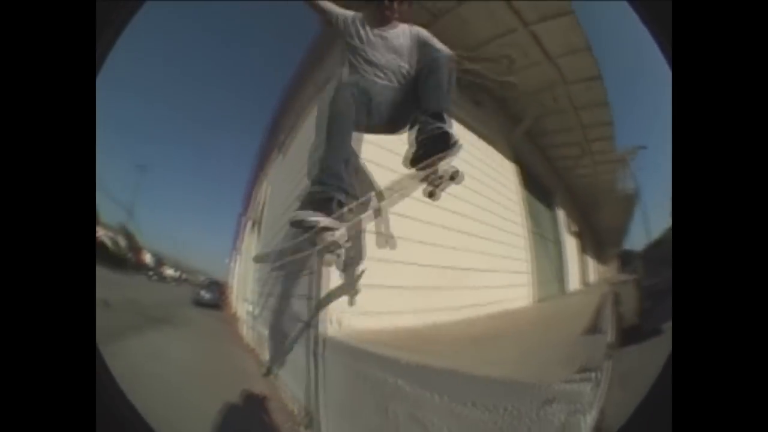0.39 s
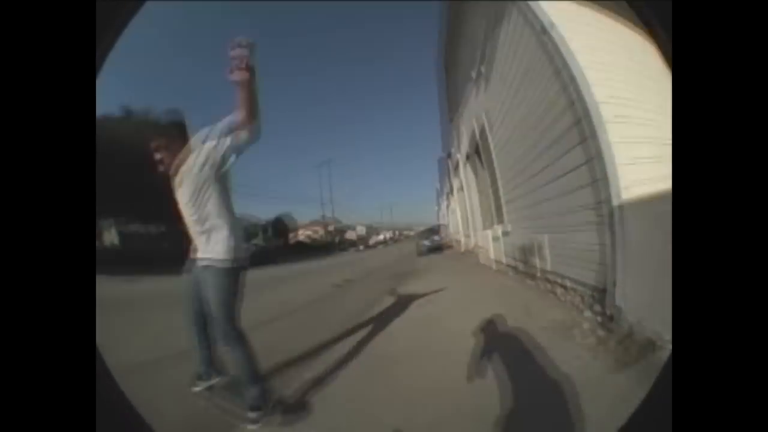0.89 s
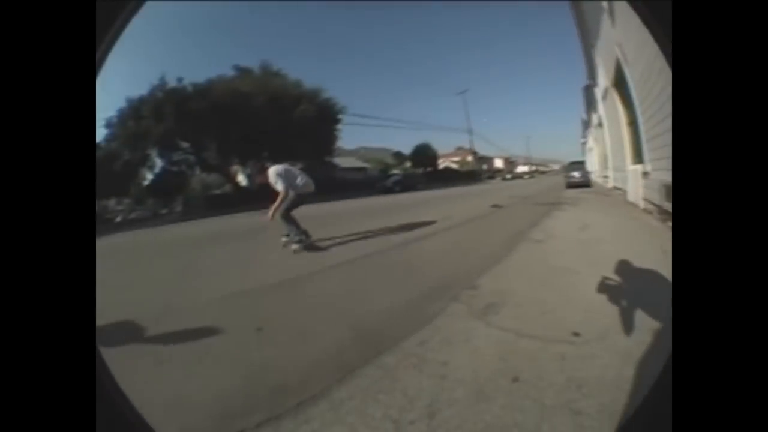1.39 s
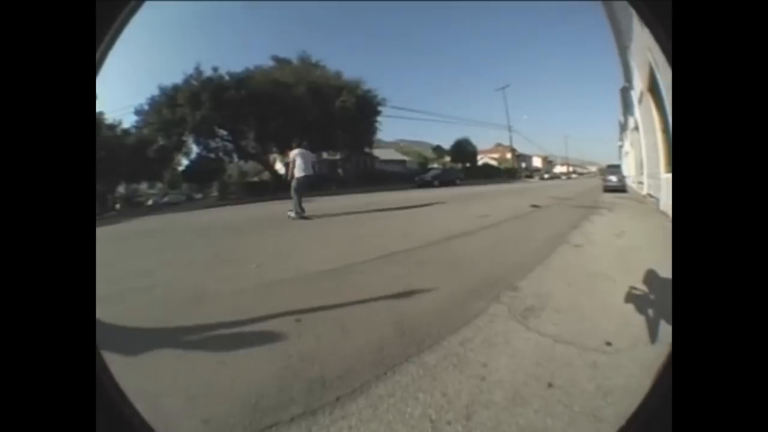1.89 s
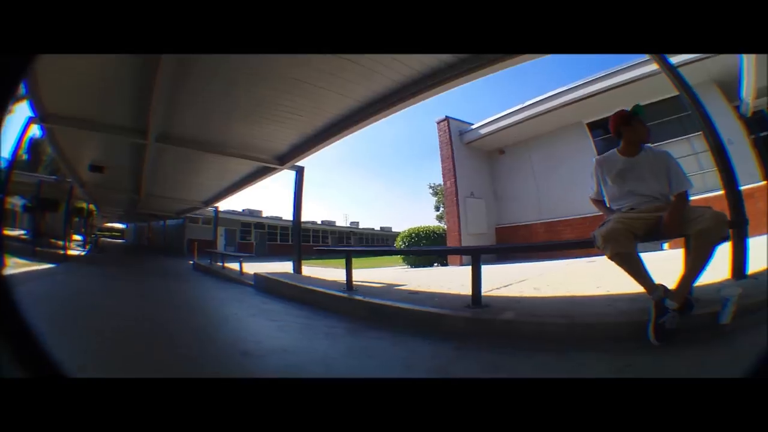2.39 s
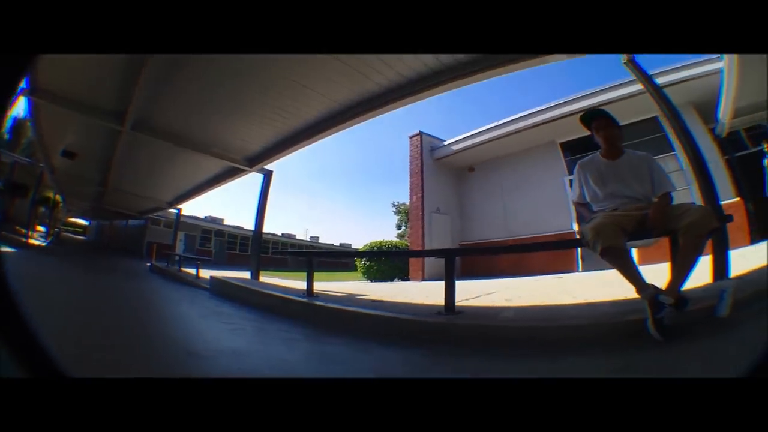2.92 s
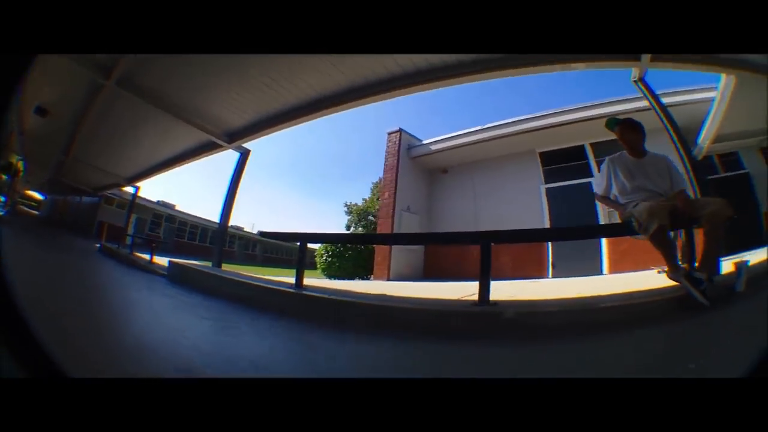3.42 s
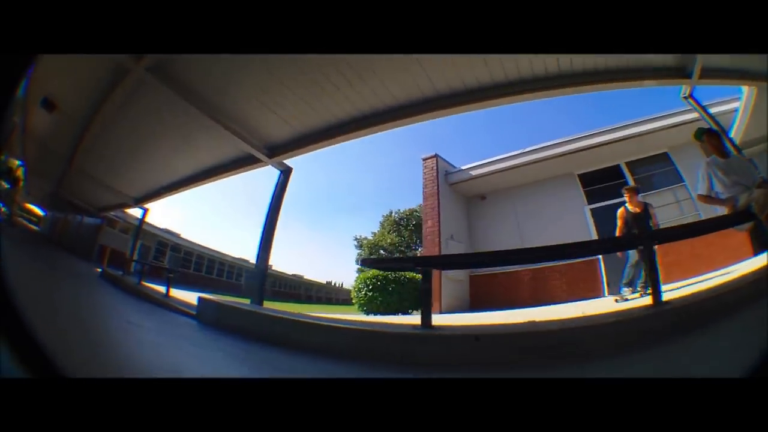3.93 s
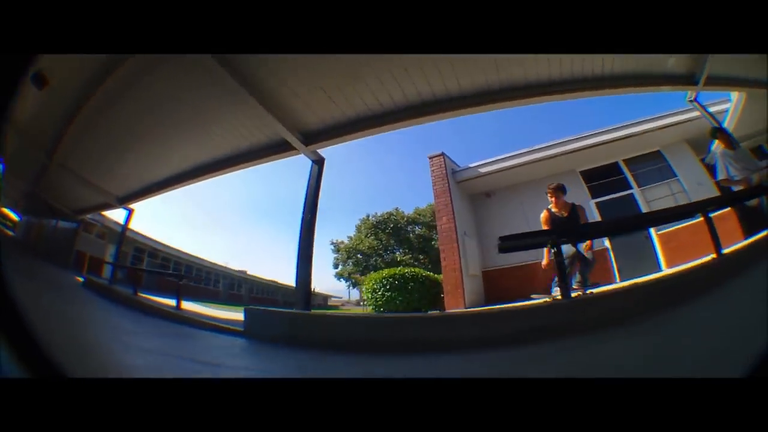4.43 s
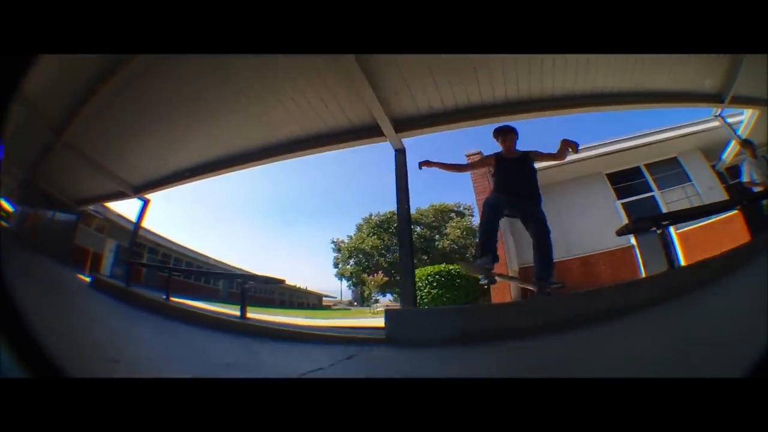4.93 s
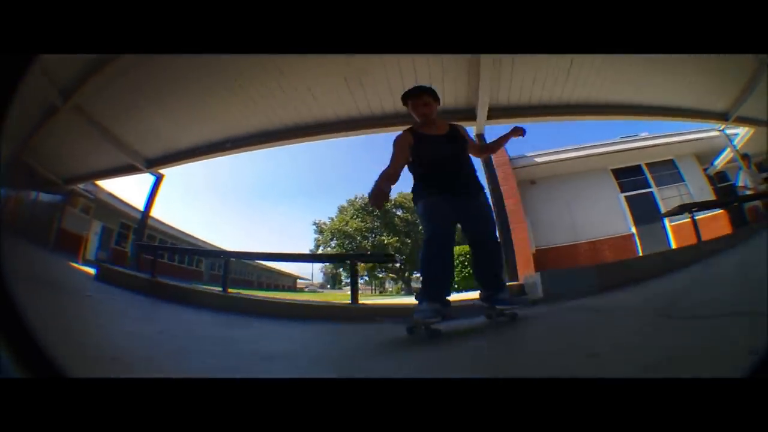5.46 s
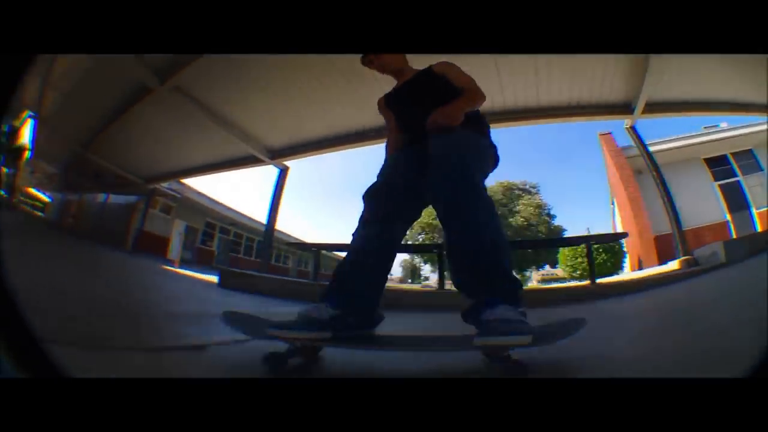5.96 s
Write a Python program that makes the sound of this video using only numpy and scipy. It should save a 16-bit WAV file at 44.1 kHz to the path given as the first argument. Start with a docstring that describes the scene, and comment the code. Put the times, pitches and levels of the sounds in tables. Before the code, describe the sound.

Skateboard pops off a ledge, slams down left and rolls away on asphalt; brief silence; then roofed walkway rolling with clacks and a landing.

```python
"""A street, then a covered walkway, two skateboarding scenes with a short silence between them. In the street a
board pops off a ledge, flips, lands hard on the listener's left and rolls away over asphalt. Under the roof, in mono,
boards roll over slabs: wheels knock on joints, a board pops, clacks on a ledge and lands. Rolling is noise shaped into
five parts of board and ground; blows are noisy contacts through a ringing board; small parts, deck and ledge ring as
decaying sines. Sparse echoes and steady air place it all, and the loudest peaks overload."""
import sys
import numpy as np
from scipy import signal
from scipy.fft import rfft, irfft
from scipy.io import wavfile
from scipy.ndimage import uniform_filter1d

SR = 44100
rng = np.random.default_rng(int(sys.argv[2]) if len(sys.argv) > 2 else 0)


def wav_out(sig):
    """Save sig, one row per channel (or a flat mono array), as 16-bit PCM at SR to the path in sys.argv[1]."""
    wavfile.write(sys.argv[1], SR, np.round(np.clip(np.atleast_2d(sig).T, -1, 1) * 32767).astype(np.int16))


def natural_amplitude(level_db):
    """Convert a level in decibels to a linear amplitude factor, elementwise."""
    exponent = np.asarray(level_db, float) / 20
    return 10 ** exponent


N = 268128
STREET_END_S, WALK_START_S, LANDING_S = 2.283, 2.412, .92

# far traffic and air in the street: (frequency [Hz], level [dB])
STREET_AIR = [(25, -45), (120, -35.5), (300, -55.5), (1500, -52.5), (15000, -50.5)]
# air under the roof: (frequency [Hz], level [dB])
WALK_AIR = [(25, -63), (70, -41.5), (200, -49), (1500, -45.5), (15000, -59)]
# echo decay in the street: (frequency [Hz], time to fall 60 dB [s])
STREET_ECHO = [(200, 0.3), (1350, 0.42), (4000, 0.23), (12000, 0.44)]
# echo decay in the walkway: (frequency [Hz], time to fall 60 dB [s])
WALK_ECHO = [(200, 0.2), (700, 0.15), (2500, 0.069), (12000, 0.045)]

# street rolling: (time [s], how hard and near the wheels roll [dB], share of free wheel spin and rasp [dB])
STREET_ROLL = [(0, -1.5, 1.5), (.15, -4.5, 4), (.23, -4, 5.5), (.3, -8.5, 0), (.43, -19, 11),
               (.54, -18, 11.5), (.67, -23, 10), (.84, -23, 7.5), (.91, -17, 4.5), (1.03, 2, -2),
               (1.12, 3.5, -2.5), (1.4, 1.5, 0.2), (1.67, -1.5, -1), (1.95, -1.5, -1.5), (2.1, 0.5, -0.7),
               (2.28, -1.5, 0.2)]
# walkway rolling: (time [s], how hard and near the wheels roll [dB], share of free wheel spin and rasp [dB])
WALK_ROLL = [(2.42, -5, -1.5), (2.75, -5, -2), (3.04, -5, -2.1), (3.22, -7, 0), (3.35, -3.5, 1.5),
             (3.46, 0.3, -1.5), (3.59, -0.8, -0.6), (3.89, 2, -0.2), (4.09, 5, 0.1), (4.28, 6.5, -1.8),
             (4.55, 3.5, -0.5), (4.8, 7, -1.7), (5.02, 1, 2), (5.22, -1.3, 4), (5.4, -4.5, 1.7),
             (5.62, 0, 0.5), (5.76, -10, 2), (5.92, -7, 3), (6.08, 3.5, 1)]
# colour of street rolling, levelled later in each part: (frequency [Hz], relative density [dB])
STREET_TONE = [(20, -45.5), (60, -27), (130, -7), (210, -1.5), (560, 7), (700, -3.5), (1300, -9.5),
               (1600, -15), (2300, -11.5), (3100, -10.5), (5000, -14), (8500, -21.5), (12600, -25.5),
               (16000, -33)]
# colour of walkway rolling, levelled later in each part: (frequency [Hz], relative density [dB])
WALK_TONE = [(20, -77), (60, -68), (120, -22.5), (300, -13.5), (500, -6.5), (850, -4.5), (1400, -12),
             (2300, -26), (2700, -29.5), (4300, -30.5), (9700, -43), (14800, -54), (16000, -40)]
# resonances in street rolling: (centre [Hz], width [Hz], lift [dB])
STREET_RINGS = [(1880, 200, 5), (4080, 520, 9.5), (6360, 250, 3), (7900, 600, 4)]
# resonances in walkway rolling: (centre [Hz], width [Hz], lift [dB])
WALK_RINGS = [(600, 90, 6.5), (700, 90, 6.5), (1250, 250, 2), (2150, 400, 2)]
# where one rolling part takes over from the next in the street: (edges [Hz])
STREET_EDGES_HZ = (250, 650, 1500, 5500)
# where one rolling part takes over from the next in the walkway: (edges [Hz])
WALK_EDGES_HZ = (300, 900, 1700, 5500)
# street rows are ground rumble, deck roar, truck buzz, wheel rasp, bearing hiss:
# (base level [dB], follows rolling [dB/dB], follows spin [dB/dB], fine-grain power share [0-1])
STREET_PARTS = [(-44.5, 0.82, -0.2, .75), (-35, 0.69, -0.83, 0.6), (-33.5, 1.46, 0.63, 0.6),
                (-40.5, 0.99, 1.1, 0.94), (-38, 1.32, 1.68, 0.56)]
# walkway rows, the same five parts:
# (base level [dB], follows rolling [dB/dB], follows spin [dB/dB], fine-grain power share [0-1])
WALK_PARTS = [(-43, 1.46, 1.4, 1), (-25.5, 1.1, 0.19, 0.81), (-27, 0.85, 0.072, 1), (-34, 0.98, 1.34, 0.89),
              (-42.5, 1.21, 1.72, 0.62)]
# after the landing the five parts drift apart as the board slows and leaves: (drift [dB/s])
LEAVING_DB_PER_S = (-3, 0.2, -3, -0.6, -0.8)
JUDDER_S, JUDDER_DB = 0.011, 0.85  # the whole board judders over coarse patches

# free wheel spinning in the air: (time [s], level [dB])
WHEEL_WHINE = [(.67, -80), (.705, -57), (.83, -61), (.89, -72)]
# loose hardware rattling on close notes: (time [s], level [dB], lowest note [Hz], contact [s])
RATTLES = [(1.557, -29, 1870, .007), (1.568, -24.5, 1870, .007), (1.65, -25.5, 1900, .009),
           (1.667, -27.5, 1870, .008), (2.594, -28, 2280, .02), (2.622, -24, 2280, .05),
           (2.675, -26, 2280, .015), (2.702, -25, 2280, .018), (2.73, -28, 2280, .03),
           (2.778, -31, 2280, .03), (2.873, -26, 2280, .03), (2.905, -21.5, 2280, .055)]
# notes that rattle together: (ratio to the lowest note)
RATTLE_NOTES = (1, 1.11, 1.23)
# board parts that clink or knock on one note: (time [s], level [dB], note [Hz], contact [s])
CLINKS = [(1.375, -27, 4200, .008), (2.038, -25.5, 4067, 0.17), (2.631, -8.5, 710, 0.0046),
          (2.631, -11, 1250, 0.0065), (2.676, -14, 734, 0.0039), (2.779, -21, 720, .012),
          (2.956, -35, 2950, .007), (2.969, -24, 3000, 0.01), (3.387, -26, 3180, .006),
          (4.231, -23, 4100, 0.0068), (4.367, -15.5, 4240, 0.0037), (4.459, -6, 805, 0.0045),
          (4.986, -18, 1570, 0.055), (5.176, -11.5, 1530, 0.0083), (5.2, -26, 1160, 0.026),
          (5.385, -12, 655, 0.013), (5.626, -7, 610, 0.01)]
RATTLE_CYCLES, CLINK_CYCLES = 36, 25  # cycles until a note has lost 60 dB
CHATTER_DB = 4.0  # rms unevenness of a ringing contact
# hum of the knocked ledge: (mode [Hz], level [dB], time to fall 60 dB [s])
LEDGE = [(142, 3, .45), (210, 0, .7), (282, -3, .35), (408, -4, .45)]
# knocks on the ledge: (time [s], level [dB], contact [s])
LEDGE_KNOCKS = [(5.163, -21, .002), (5.364, -19, .003), (5.558, -23, .002), (5.618, -23, .002)]
# deck singing free in the air: (mode [Hz], level [dB], time to fall 60 dB [s])
FREE_DECK = [(720, -9, .18), (1303, -1, .32), (1345, 0, .27), (1645, -5, .24), (2056, -11, .25),
             (2315, -8, .2), (2800, -8, .15)]
# pop and foot flick that set the deck singing: (time [s], level [dB], contact [s], share of ring time left [0-1])
FREE_STRIKES = [(.253, -10.5, .0003, 1), (.5105, -25, .0003, .2)]

# the landing shakes ground and microphone: (swing [Hz], left level [dB], right level [dB], time to fall 60 dB [s])
THUMP = [(30, -12, -33.5, 0.15), (151, -11, -25, 0.091), (212.5, -10.5, -14.5, 0.14)]
# blows and knocks: (time [s], drive [dB], thud tilt [dB], crack tilt [dB], contact [s])
BLOWS = [(0.2508, 2.4, -13, 1, 0.0082), (0.5088, -24.5, -31, -6, 0.0046), (.836, -44, 9.5, -12, 0.026),
         (0.9168, 6.5, -3, -6, 0.0098), (.955, -15, 4, -42, 0.0057), (1.332, -29, 8, 7.5, 0.0066),
         (1.4168, -35, 14, 5, 0.0028), (2.4216, -23, 7, -18.5, 0.0073), (2.4937, -26.5, -8, -0.5, 0.0017),
         (2.5524, -16.5, 4, 0.3, .005), (2.564, -19, 2.5, -9, 0.0048), (2.6312, -10.5, -4, -0.5, 0.00086),
         (2.6758, -16, -2, -7.5, 0.0027), (2.893, -20, -1, -11, 0.026), (2.9248, -18, 2.5, -8.5, 0.031),
         (2.935, -20.5, -16, 8, 0.0015), (3.276, -14.5, 5.5, -3, .007), (3.385, -20, -3, -3, 0.0034),
         (3.5136, -18.5, 9, -8, 0.0063), (3.558, -21, -6.5, -7.5, 0.017), (3.6247, -17, -24, -10, 0.0017),
         (3.939, -24, 11.5, 4, 0.011), (4.3297, -26, -1, 6.5, 0.017), (4.454, -18, 4, 1, 0.002),
         (4.963, -5.5, 0, -2, 0.0077), (4.9753, -12, -2, -11, 0.017), (5.1625, -4.5, 3.5, 0.5, 0.0055),
         (5.1772, -11.5, 1, -34, 0.0037), (5.364, -9, 5, -8, 0.004), (5.3816, -9.5, 5, 1.5, 0.0023),
         (5.556, -16.5, 6.5, -14, 0.016), (5.6179, -1.5, -3, 4.5, 0.0044), (5.629, -3.5, 0, -18, 0.0038)]
# what a struck board rings with: (centre [Hz], width [Hz], lift [dB])
BOARD = [(280, 100, -3.5), (425, 160, -3), (796, 61, 1.5), (1407, 300, 5), (1627, 160, 0.5), (2000, 330, 0),
         (2480, 81, 5.5), (2750, 170, -3), (4170, 270, -2), (4030, 620, 5), (5030, 63, 1.5)]
# basic colour of a blow: (frequency [Hz], gain [dB])
BLOW_TONE = [(40, -30), (150, 1.5), (500, 8), (1500, -5.5), (4000, -3.5), (8000, -11.5), (15000, -21)]
# further colour of all hits under the roof: (frequency [Hz], gain [dB])
WALK_BLOW_TONE = [(60, -39), (250, -6.5), (450, -5.5), (680, 0.5), (1000, 2), (6000, -3.5), (15000, -6.5)]
SETTLE_S, SETTLE_PER_CONTACT = 0.012, 4.5  # time to fall 60 dB after the contact, longer after a long one

# how alike the street's two sides are: (frequency [Hz], likeness [0-1])
STREET_SAME = [(60, 0.45), (240, 0.88), (950, 0.83), (3770, 0.79), (15000, 0.58)]
# lean of the microphone pair, before the skater's own shift: (frequency [Hz], left minus right [dB])
STREET_LEFT = [(60, 9), (240, 10.5), (950, 11), (3770, 10.5), (15000, 8)]
# the skater comes from the right: (time [s], lift on the right, with half as much taken off the left [dB])
SKATER_RIGHT = [(0, 1.6), (.25, 3.4), (.45, 2.8), (.6, .1)]


def evened(x):
    """Scales to rms 1."""
    return x / np.sqrt(np.mean(x ** 2) + 1e-20)


def read(points, hz):
    """Reads a table on a log-frequency axis."""
    f, value = np.transpose(points)
    return np.interp(np.log(hz + 1), np.log(f + 1), value)


def rings_db(rings, hz):
    """Adds up resonant humps, each falling away on both sides of its centre."""
    return sum(db / (1 + ((hz - f) / (width / 2)) ** 2) for f, width, db in rings)


def causal(colour_db):
    """Minimum-phase impulse response of a colour given on an rfft grid."""
    log_gain = np.log(natural_amplitude(np.r_[colour_db, colour_db[-2:0:-1]]))
    spectrum = np.exp(np.conj(signal.hilbert(log_gain)))
    return np.fft.ifft(spectrum).real[:len(colour_db) - 1]


def air(tone):
    """Steady background of the place: coloured noise, two unrelated draws."""
    colour = natural_amplitude(read(tone, np.fft.rfftfreq(N, 1 / SR)))
    return irfft(rfft(rng.standard_normal((2, N))) * colour, N)


def echo(x, t60s, delay_s):
    """Sparse reflections of random sign, each band dying at its own speed."""
    taps = np.zeros((2, SR // 2))
    # one tap in every 20 samples, at a random spot
    at = np.arange(0, SR // 2 - 20, 20) + rng.integers(0, 20, (2, (SR // 2 - 1) // 20))
    np.put_along_axis(taps, at, rng.choice([-1., 1.], at.shape), 1)
    hz, t, z = signal.stft(taps, SR, nperseg=256)
    decay = natural_amplitude(-60 * t / read(t60s, hz)[:, None])
    tail = signal.istft(z * decay, SR, nperseg=256)[1]
    late = np.pad(x, ((0, 0), (round(delay_s * SR), 0)))
    return signal.oaconvolve(late, tail / np.linalg.norm(tail[0]), axes=1)[:, :N]


def whine():
    """A spinning bearing whistles on one narrow, fuzzy note."""
    s, db = np.transpose(WHEEL_WHINE)
    t = np.arange(N) / SR
    level = natural_amplitude(np.interp(t, s, db, -120, -120))
    fuzz = .8 + .8 * evened(uniform_filter1d(rng.standard_normal((2, N)), 250))
    return level * fuzz * np.sqrt(2) * np.sin(2 * np.pi * 2370 * t)


def rung(strikes):
    """Each strike (s, dB, contact s, modes) is a short uneven rattle that rings its modes; two unrelated draws."""
    out, t = np.zeros((2, N + 49152)), np.arange(32768) / SR
    noise = rng.standard_normal((len(strikes), 3, 8192))
    for (s, db, contact, modes), (a, b, c) in zip(strikes, noise):
        ring = sum(np.sin(2 * np.pi * hz * t) * natural_amplitude(mode_db - 60 * t / t60) for hz, mode_db, t60 in modes)
        chatter = natural_amplitude(CHATTER_DB * evened(uniform_filter1d(uniform_filter1d(c, 200), 200)))
        swell = np.sin(np.pi * np.minimum(t[:8192] / contact, 1))
        push = np.array([a, b]) * chatter * swell
        sound = signal.fftconvolve(push, ring[None], axes=1)
        peak = abs(sound).max(1)[:, None]
        at = round(s * SR)
        out[:, at:at + sound.shape[1]] += natural_amplitude(db) * sound / peak
    return out[:, :N]


def rattles():
    """Loose hardware shakes, and its close notes speak together."""
    return rung([(s, db, contact, [(hz * k, 0, RATTLE_CYCLES / (hz * k)) for k in RATTLE_NOTES])
                 for s, db, hz, contact in RATTLES])


def clinks():
    """Small parts ring one note each, high notes dying sooner."""
    return rung([(s, db, contact, [(hz, 0, CLINK_CYCLES / hz)]) for s, db, hz, contact in CLINKS])


def ledge():
    """The ledge hums on low modes that outlast the knock."""
    return rung([(*knock, LEDGE) for knock in LEDGE_KNOCKS])


def free_deck():
    """The deck rings on in the air, for a shorter time with a foot on it."""
    return rung([(s, db, contact, [(hz, mode_db, left * t60) for hz, mode_db, t60 in FREE_DECK])
                 for s, db, contact, left in FREE_STRIKES])


def grit(per_s, spread_db):
    """Stones under the wheels: random kicks of uneven size, and the fine grain of the ground."""
    happens = rng.random(N) < per_s / SR
    size = natural_amplitude(spread_db * np.minimum(rng.exponential(1, N), 3.3)) * happens
    return evened(size * rng.standard_normal(N)), rng.standard_normal(N)


def roll(rows, parts, edges_hz, tone, rings, per_s, spread_db, lumpy_db, drift_db_per_s):
    """Grit shakes ground, deck, trucks, wheels and bearings, each heard in its own range; two unrelated draws."""
    t = np.arange(N) / SR
    s, *controls = np.transpose(rows)
    rolling, spin = (np.interp(t, s, db) for db in controls)
    since_landing = np.maximum(t - LANDING_S, 0)
    hz = np.fft.rfftfreq(4096, 1 / SR)
    colour_db = read(tone, hz) + rings_db(rings, hz)
    # power below each edge; the differences are the ranges of the parts
    below = [0 * hz] + [1 / (1 + (hz / edge) ** 8) for edge in edges_hz] + [1 + 0 * hz]
    ranges = np.diff(below, axis=0)
    out = np.zeros((2, N))
    for draw in out:
        kicks, grain = grit(per_s, spread_db)
        patches = uniform_filter1d(rng.standard_normal(N), size=100)
        judder = evened(signal.lfilter([1], [1, -np.exp(-1 / (JUDDER_S * SR))], patches))
        for share, (db, by_roll, by_spin, fine), drift in zip(ranges, parts, drift_db_per_s):
            lumps = evened(uniform_filter1d(uniform_filter1d(rng.standard_normal(N), 500), 500))  # uneven ground
            body = causal(colour_db + 10 * np.log10(np.maximum(share, 1e-8)))
            shake = np.sqrt(1 - min(fine, 1)) * kicks + np.sqrt(min(fine, 1)) * grain
            level_db = db + by_roll * rolling + by_spin * spin + drift * since_landing
            unevenness_db = lumpy_db * lumps + JUDDER_DB * judder
            sound = signal.oaconvolve(shake, body / np.linalg.norm(body))[:N]
            draw += natural_amplitude(level_db + unevenness_db) * sound
    return out


def jolt():
    """The landing sets off slow decaying swings, stronger on the left."""
    t = np.maximum(np.arange(N) / SR - LANDING_S, 0)
    return sum(natural_amplitude(np.c_[left_db, right_db].T - 60 * t / t60) * np.sin(2 * np.pi * hz * t)
               for hz, left_db, right_db, t60 in THUMP)


def blows():
    """Each blow is a rattle of contacts that dies away and rings the board; two unrelated draws."""
    out, t, hz = np.zeros((2, N + 16384)), np.arange(8192) / SR, np.fft.rfftfreq(4096, 1 / SR)
    noise = rng.standard_normal((len(BLOWS), 3, 8192))
    for (s, db, thud_db, crack_db, contact), (a, b, c) in zip(BLOWS, noise):
        onset = np.minimum(t / min(0.13 * contact, .004), 1)
        settle_s = SETTLE_S + SETTLE_PER_CONTACT * contact
        push = onset * natural_amplitude(-60 * np.maximum(t - contact, 0) / settle_s)
        rattle = natural_amplitude(3 * evened(uniform_filter1d(c, 40)))
        tilt_db = read([(600, thud_db), (1300, 0.011), (2300, 0.011), (4000, crack_db)], hz)
        body = causal(read(BLOW_TONE, hz) + rings_db(BOARD, hz) + tilt_db)
        sound = signal.fftconvolve(np.array([a, b]) * push * rattle, body[None], axes=1)
        at = round(s * SR)
        out[:, at:at + sound.shape[1]] += natural_amplitude(db) * sound
    return out[:, :N]


def ports(draws):
    """Turns two unrelated draws into a left-heavy microphone pair."""
    hz = np.fft.rfftfreq(N, 1 / SR)
    a, b = rfft(draws)
    same = np.clip(read(STREET_SAME, hz), 0, 1)
    right = natural_amplitude(-read(STREET_LEFT, hz))
    right_side = right * (same * a + np.sqrt(1 - same ** 2) * b)
    return irfft(np.array([a, right_side]) * 2 / (1 + right), N)


def scene():
    """The street in stereo, a short silence, then the walkway in mono."""
    t = np.arange(N) / SR
    hits = blows() + clinks() + rattles() + free_deck() + ledge()

    street = roll(STREET_ROLL, STREET_PARTS, STREET_EDGES_HZ, STREET_TONE, STREET_RINGS,
                  per_s=3000, spread_db=3.8, lumpy_db=0.88, drift_db_per_s=LEAVING_DB_PER_S)
    street += whine() + air(STREET_AIR) + hits + natural_amplitude(-11) * echo(hits, STREET_ECHO, .012)
    right_db = np.interp(t, *np.transpose(SKATER_RIGHT))
    street = ports(street) * natural_amplitude(np.array([-right_db / 2, right_db])) + jolt()

    walk = roll(WALK_ROLL, WALK_PARTS, WALK_EDGES_HZ, WALK_TONE, WALK_RINGS,
                per_s=1500, spread_db=3.1, lumpy_db=0.68, drift_db_per_s=np.zeros(len(WALK_PARTS)))
    walk += air(WALK_AIR)
    roof = causal(read(WALK_BLOW_TONE, np.fft.rfftfreq(4096, 1 / SR)))
    walk_hits = (hits + natural_amplitude(-11.0) * echo(hits, WALK_ECHO, 0.0074))[0]
    walk = walk[0] + signal.oaconvolve(walk_hits, roof)[:N]

    # the street drops by 30 dB at once, and a faint rest fades within 28 ms
    rest = natural_amplitude(-30 - 700 * (t - STREET_END_S)) * (t < STREET_END_S + .028)
    ending = np.where(t < STREET_END_S, 1, rest)
    return street * ending + walk * (t > WALK_START_S)


def top_cut(x):
    """Nothing passes above the cut-off."""
    return signal.sosfilt(signal.butter(12, 16490, fs=SR, output="sos"), x)


def record(dry):
    """The street microphones overload early, the walkway's hardly at all; each place has its band limit."""
    first = np.arange(N) < (STREET_END_S + WALK_START_S) / 2 * SR
    top = np.where(first, .74, 1.05)  # ceiling of the soft overload
    held = dry / (1 + (abs(dry) / top) ** 6) ** (1 / 6)
    street, walk = (signal.oaconvolve(held, signal.firwin(301, edge_hz, fs=SR)[None], "same")
                    for edge_hz in (15700, 15200))
    return top_cut(np.where(first, street, walk))


dry = scene()
out = record(dry)
wav_out(out)
```